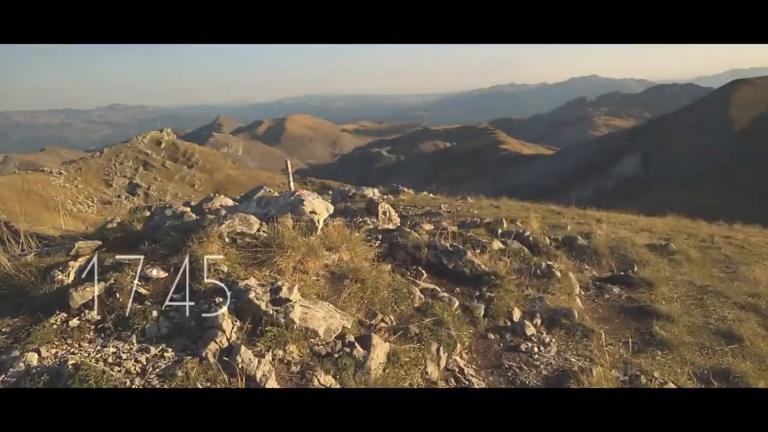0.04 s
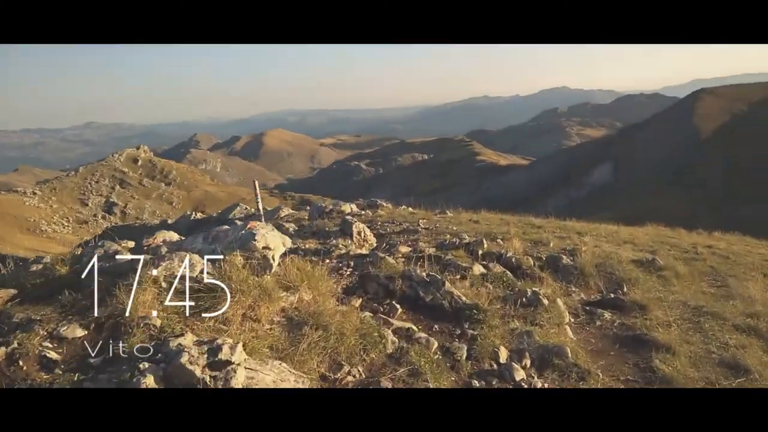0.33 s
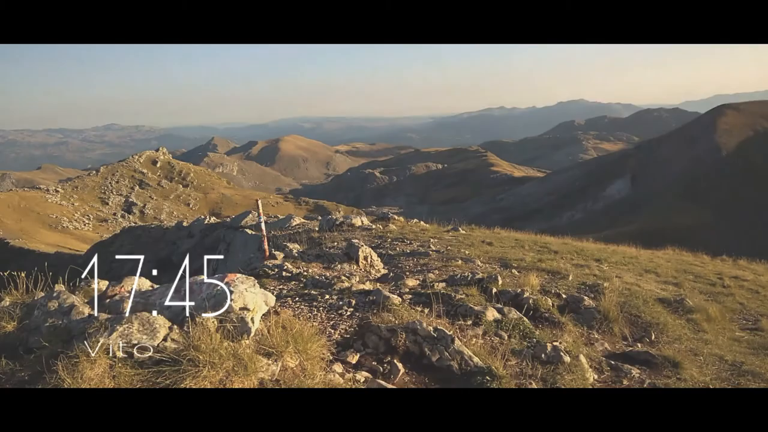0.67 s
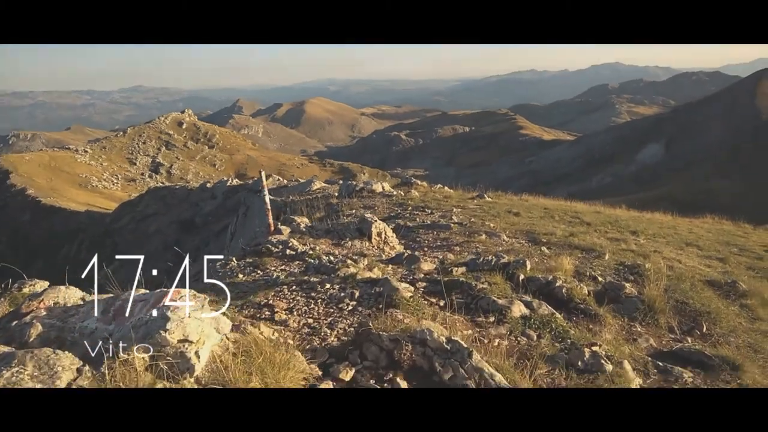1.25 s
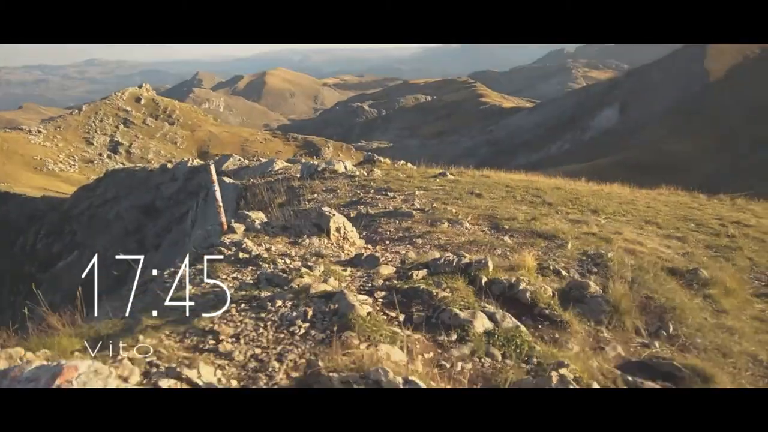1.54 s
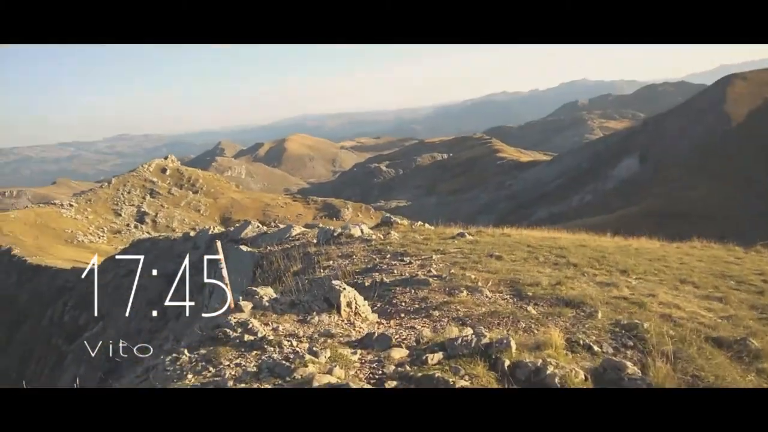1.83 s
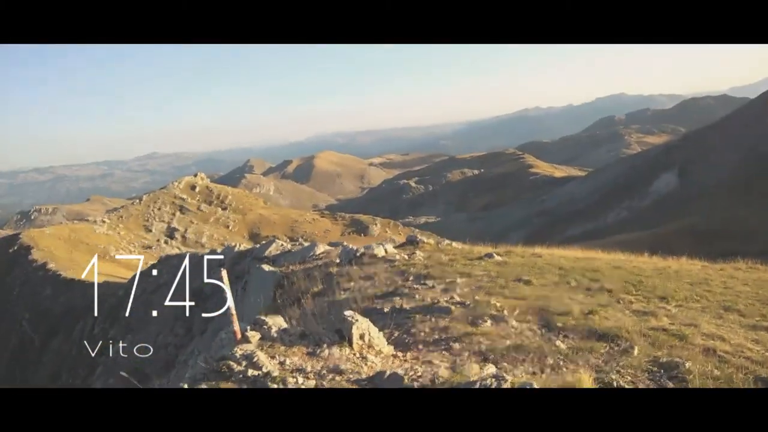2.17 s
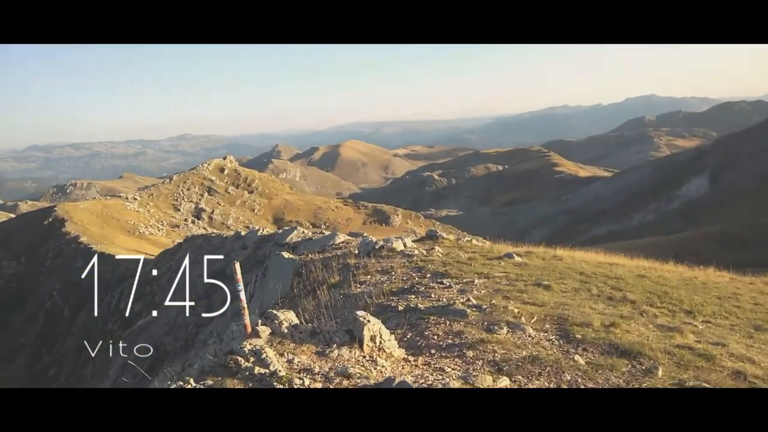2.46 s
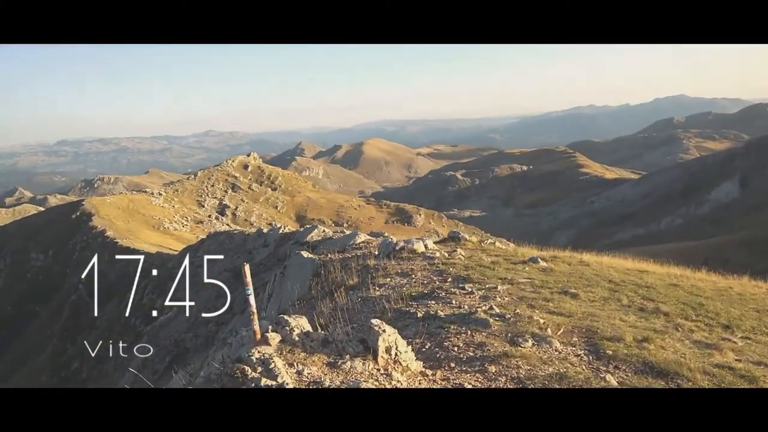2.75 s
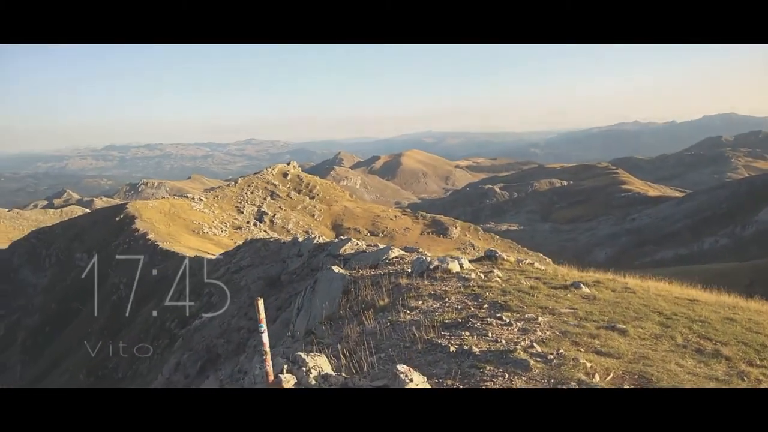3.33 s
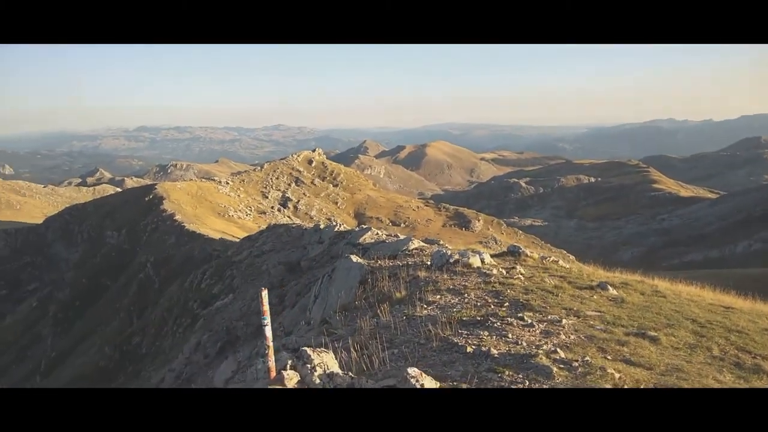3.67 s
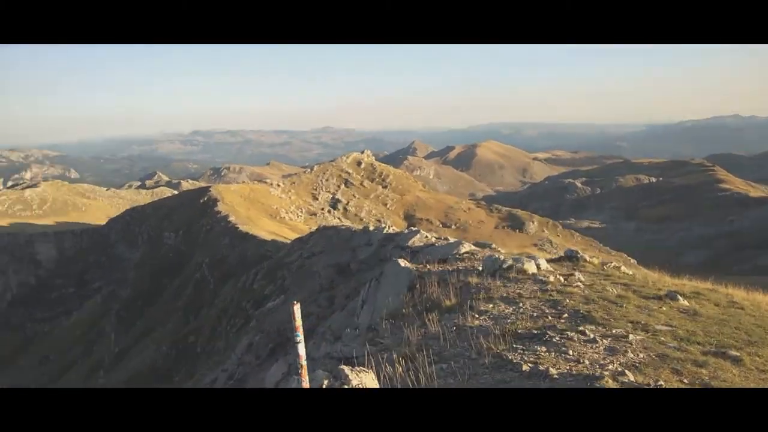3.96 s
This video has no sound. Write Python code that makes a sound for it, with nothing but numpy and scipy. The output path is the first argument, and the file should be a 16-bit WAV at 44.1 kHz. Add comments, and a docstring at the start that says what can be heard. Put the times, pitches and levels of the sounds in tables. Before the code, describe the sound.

Wind buffets the microphone while a walker's boots faintly crunch and clack on rocky ground.

```python
"""Walk on a windy ridge.

A walker crosses stony, grassy ground in gusty wind. Legs brush through dry grass, a pole tip or
loose stones knock and clink on rock, and boots crunch on grit. Turbulence rumbles at the two
microphone ports, and single eddies thump on them, mostly on the left one."""
import sys
import numpy as np
from scipy import signal
from scipy.fft import rfft, irfft
from scipy.io import wavfile
from scipy.ndimage import uniform_filter1d

SR = 44100
rng = np.random.default_rng(int(sys.argv[2]) if len(sys.argv) > 2 else 0)


def dump_mix(stems):
    """Bounce the given channels to the path in sys.argv[1] as a 16-bit WAV at rate SR."""
    frames = np.atleast_2d(stems).T  # one column per channel
    limited = np.clip(frames, -1, 1)  # hard clip at full scale
    pcm = np.round(limited * 32767).astype(np.int16)
    wavfile.write(sys.argv[1], SR, pcm)


N = 176400
TIME_S = np.arange(N) / SR

# Noise colours. Each row: frequency in Hz, relative spectral density in dB.
AIR_SPECTRUM = [(700, 3), (1500, -2), (2500, -2.5), (3900, 6.5), (5500, -7), (16000, -19.5)]
RUMBLE_SPECTRUM = [(15, -11), (35, -11), (70, 0), (130, 3), (260, 1), (400, -8), (600, -34.5), (1000, -42),
                   (1800, -91.5)]
FLUTTER_SPECTRUM = [(150, -33.5), (350, 6), (600, -2), (1000, -21.5), (1500, -30.5), (2500, -72)]
GRASS_SPECTRUM = [(300, 0), (1800, -4.5), (2800, -1), (4000, 4), (5100, -4.5), (5700, -13.5), (9000, -16.5),
                  (11500, -28.5), (15000, -28.5)]
STALK_SPECTRUM = [(3000, -23.5), (6000, 2.5), (9000, 3.5), (14000, -3.5), (16000, 1)]
KNOCK_SPECTRUM = [(500, -36), (1400, -3), (1950, -9.5), (2700, -3.5), (4050, 0.5), (4900, -20.5),
                  (6500, -22.5), (9500, -12), (12000, -25), (15000, -20)]
GRIT_SPECTRUM = [(600, -14), (1500, -1), (2400, 3), (3900, 4.5), (5300, -2), (6600, -6.5), (11500, -25),
                 (15000, -24)]
# Wind strength at each port. Each row: time in seconds, level in dB.
GUSTS_LEFT = [(0.0, -56), (0.06, -42), (0.18, -54), (0.28, -36), (0.56, -45), (0.68, -50.5), (0.74, -36),
              (0.88, -62.5), (1.1, -29), (1.66, -35.5), (1.7, -50.5), (1.82, -46), (2.12, -38),
              (2.2, -30.5), (2.24, -34.5), (2.34, -35.5), (2.6, -44), (2.64, -31), (2.82, -42),
              (2.88, -29.5), (3.06, -39), (3.1, -27.5), (3.2, -43), (3.3, -24.5), (3.4, -40), (3.99, -34)]
GUSTS_RIGHT = [(0.0, -52.5), (0.3, -67), (0.36, -54), (0.54, -60), (0.66, -39.5), (0.88, -58),
               (1.04, -30.5), (1.2, -45.5), (1.62, -39), (1.66, -58.5), (1.72, -49), (1.78, -56),
               (2.28, -32), (2.38, -70.5), (2.52, -35), (2.72, -59), (2.86, -37), (3.34, -34), (3.48, -41),
               (3.74, -43.5), (3.84, -53), (3.99, -46)]
# Strokes through grass and dry stalks. Each row: peak time, rise and fall in seconds, level in dB.
GRASS_SWISHES = [(0.06, 0.029, 0.11, -64.5), (0.35, 0.097, 0.045, -63.5), (0.60, 0.088, 0.071, -67),
                 (0.81, 0.036, 0.066, -63.5), (0.98, 0.078, 0.13, -63.5), (1.28, 0.032, 0.063, -66),
                 (1.53, 0.038, 0.11, -66), (2.07, 0.069, 0.09, -59), (2.495, 0.0095, 0.016, -58),
                 (2.58, 0.036, 0.046, -64), (2.99, 0.069, 0.049, -67.5), (3.58, 0.23, 0.17, -69),
                 (3.76, 0.027, 0.038, -63), (3.93, 0.049, 0.038, -66.5)]
STALK_SWISHES = [(3.61, 0.061, 0.052, -72.5), (3.74, 0.057, 0.063, -77)]
# Knocks on rock. Each row: start in seconds, level in dB, treble gain in dB, rattle decay in seconds,
# bounce delay in seconds, bounce gain in dB, ping gain in dB.
ROCK_KNOCKS = [(0.057, -55.5, -4.5, 0.014, .006, -8, -13), (0.471, -64.5, -26, .005, .004, -16, -35),
               (2.0982, -37, 2.5, .01, .0117, 6, -9), (2.2293, -46, -7, 0.012, .0052, 5, -18),
               (2.3308, -56.5, -9.5, 0.0066, .004, -16, -16), (2.7816, -49.5, -7.5, 0.01, .006, 3, -17),
               (2.8673, -38.5, -45, 0.0053, .0048, -11, -52.5), (2.9459, -47, -13, 0.016, .0082, 1, -9),
               (3.018, -61.5, -17, .009, .007, -2.5, -12)]
# Modes of a struck stone. Each row: frequency in Hz, relative level in dB.
STONE_MODES = [(2330, 3), (2720, 3), (3370, 8), (4030, 5)]
# Metallic ping after a knock. Each row: frequency in Hz, relative level in dB, T60 in seconds.
PING_MODES = [(1640, 8, .1), (6570, -1, .13), (6690, -5, .09)]
# Eddies hitting a port. Each row: time in seconds, length in seconds, level in dB, low-pass corner
# in Hz, port (0 left, 1 right).
EDDY_HITS = [(0.106, 0.0088, -21.5, 320, 0), (0.32, 0.0057, -29.5, 315, 0), (0.404, 0.013, -23, 370, 0),
             (0.569, 0.0047, -26.5, 235, 0), (0.667, 0.009, -24.5, 376, 1), (0.693, 0.025, -26.5, 427, 1),
             (0.977, 0.0026, -12.5, 390, 0), (0.997, 0.017, -23.5, 290, 0), (1.118, 0.0032, -12, 560, 0),
             (1.126, 0.0024, -22, 656, 0), (1.192, 0.0043, -9.5, 366, 0), (1.212, 0.0061, -13, 270, 0),
             (1.241, 0.0026, -20.5, 448, 0), (1.27, 0.017, -10.5, 330, 0), (1.308, 0.0038, -15.5, 450, 0),
             (1.334, 0.0081, -14, 300, 0), (1.359, 0.007, -18.5, 440, 0), (1.387, 0.0018, -28, 520, 0),
             (1.397, 0.0049, -20, 367, 1), (1.428, 0.012, -19.5, 387, 0), (1.474, 0.0056, -26, 523, 0),
             (1.557, 0.0021, -16.5, 386, 0), (1.579, 0.0052, -22, 380, 0), (1.638, 0.0044, -13, 396, 0),
             (1.717, 0.016, -23, 330, 1), (1.823, 0.015, -23.5, 281, 0), (1.877, 0.0072, -25.5, 297, 0),
             (1.988, 0.0024, -18, 370, 0), (2.136, 0.0038, -24.5, 457, 1), (2.174, 0.0021, -9, 412, 0),
             (2.281, 0.0068, -24.5, 480, 1), (2.321, 0.0062, -18, 400, 0), (2.348, 0.0059, -18.5, 410, 0),
             (2.427, 0.0031, -21.5, 357, 0), (2.478, 0.0069, -24.5, 340, 1), (2.558, 0.0091, -22, 400, 1),
             (2.626, 0.0013, -4.5, 451, 0), (2.656, 0.0052, -18, 454, 0), (2.691, 0.0072, -21, 246, 0),
             (2.855, 0.0098, -13.5, 368, 0), (2.88, 0.0068, -18.5, 363, 1), (2.896, 0.012, -15, 440, 0),
             (2.971, 0.037, -25.5, 409, 0), (3.08, 0.003, -14, 374, 0), (3.103, 0.012, -13, 554, 1),
             (3.146, 0.0083, -21.5, 430, 1), (3.197, 0.019, -18, 295, 0), (3.223, 0.014, -20.5, 336, 0),
             (3.309, 0.014, -17, 342, 0), (3.33, 0.0034, -9.5, 466, 0), (3.338, 0.0062, -6, 518.3, 0),
             (3.357, 0.0019, -22.5, 465, 1), (3.554, 0.01, -21.5, 350, 0), (3.767, 0.0072, -12.5, 370, 0),
             (3.789, 0.021, -20, 327, 0), (3.819, 0.0019, -18, 470, 0), (3.833, 0.0054, -12.5, 338, 0),
             (3.857, 0.014, -24, 420, 0)]
# Boots on grit. Each row: peak time, rise and decay in seconds, level in dB.
BOOT_CRUNCHES = [(0.161, 0.0046, 0.0084, -64), (0.490, 0.0067, 0.033, -60.5), (0.772, 0.003, 0.012, -39.5),
                 (0.886, .005, 0.015, -56.5), (1.02, 0.0071, 0.009, -49.5), (1.035, .004, 0.019, -48.5),
                 (1.078, .003, .012, -52), (1.1, 0.0056, 0.0096, -42), (1.108, .001, 0.0049, -41),
                 (1.149, .005, 0.0053, -54.5), (1.237, 0.0016, 0.0054, -50), (2.076, 0.0012, 0.021, -49),
                 (2.932, 0.0012, 0.0099, -57.5), (3.785, 0.0026, .006, -62.5), (3.923, .002, .006, -59)]


def from_db(db):
    """Decibels to gain."""
    return 10 ** (np.asarray(db) / 20)


def unit_rms(x):
    """Scale to rms 1."""
    return x / np.sqrt(np.mean(x ** 2) + 1e-20)


def coloured(x, spectrum):
    """Minimum-phase spectral shaping; rms 1."""
    size, (hz, db) = x.shape[-1], np.transpose(spectrum)
    bins_hz = np.maximum(np.fft.rfftfreq(size, 1 / SR), 1)
    gain = from_db(np.interp(np.log(bins_hz), np.log(hz), db))
    cepstrum = irfft(np.log(gain), size)
    response = np.exp(2 * rfft(cepstrum[:size // 2], size))
    return unit_rms(irfft(rfft(x) * response, size))


def butter(x, hz, kind, order):
    """Butterworth low- or high-pass."""
    return signal.sosfilt(signal.butter(order, hz, kind, fs=SR, output="sos"), x)


def drift(corner_hz):
    """Slow random wander; rms 1."""
    bins_hz = np.fft.rfftfreq(N, 1 / SR)
    return unit_rms(irfft(rfft(rng.standard_normal(N)) / (1 + (bins_hz / corner_hz) ** 4), N))


def clicks(shape, per_s):
    """Randomly timed impulses of either sign."""
    return (rng.random(shape) < per_s / SR) * rng.choice([-1, 1], shape)


def evened(noise, window_s=0.019):
    """Level out the chance peaks of a noise."""
    power = uniform_filter1d(noise ** 2, int(window_s * SR))
    power = uniform_filter1d(power, int(window_s * SR / 2))
    return noise / np.sqrt(np.abs(power) + 1e-9)


def swells(rows):
    """Envelope of Gaussian rises and falls, summed in power."""
    return np.sqrt(sum(
        from_db(db) ** 2 * np.exp(-((TIME_S - peak_s) / np.where(TIME_S < peak_s, rise_s, fall_s)) ** 2)
        for peak_s, rise_s, fall_s, db in rows))


def at_feet(pair, left_db=-10, left_lead_s=0.0005, likeness=0.073):
    """Place a pair at the walker's feet: partly alike, louder on the right."""
    blend = likeness * pair[1] + np.sqrt(1 - likeness ** 2) * pair[0]
    left = np.interp(TIME_S + left_lead_s, TIME_S, blend)
    return np.array([from_db(left_db) * left, pair[1]])


def air(left_db=-82, right_db=-75.5):
    """Faint, steady hiss of still air."""
    return from_db([[left_db], [right_db]]) * coloured(rng.standard_normal((2, N)), AIR_SPECTRUM)


def wind(gusts, rumble_db=6, flutter_db=-12, rumble_swing_db=7.5, flutter_swing_db=6.5):
    """Turbulence at one port: lumpy rumble, with small pops fluttering in the stronger eddies."""
    strength = from_db(np.interp(TIME_S, *np.transpose(gusts)))
    ceiling = 1.22
    eddies = ceiling * np.tanh(drift(corner_hz=36.4) / ceiling)
    swirl = evened(coloured(rng.standard_normal(N), RUMBLE_SPECTRUM))
    rumble = unit_rms(swirl * from_db(rumble_swing_db * eddies))
    pops = clicks(N, per_s=110) * from_db(flutter_swing_db * eddies)
    flutter = coloured(pops, FLUTTER_SPECTRUM)
    return strength * (from_db(rumble_db) * rumble + from_db(flutter_db) * flutter)


def grass(brush_flicker_db=0.92, stalk_flicker_db=1.4):
    """Legs brush through grass: soft swishes and a thin hiss of dry stalks."""
    brush = coloured(rng.standard_normal((2, N)), GRASS_SPECTRUM)
    brush *= from_db(brush_flicker_db * drift(corner_hz=160))
    stalks = coloured(rng.standard_normal((2, N)), STALK_SPECTRUM)
    stalks *= from_db(stalk_flicker_db * drift(corner_hz=60))
    return at_feet(swells(GRASS_SWISHES) * brush) + swells(STALK_SWISHES) * stalks


def stone_clack(t, t60_s=0.039, detune=0.015):
    """Hollow, fast-dying modes of a struck stone, each stone pitched a little differently."""
    pitch = 1 + detune * rng.standard_normal()
    modes = sum(from_db(db + rng.normal(0, 2.5)) * np.cos(2 * np.pi * pitch * hz * t)
                for hz, db in STONE_MODES)
    return from_db(-60 * t / t60_s) * modes


def ping(t):
    """Brief metallic ring of decaying modes in random phase."""
    return sum(from_db(db - 60 * t / t60_s + rng.normal(0, 2))
               * np.sin(2 * np.pi * (hz * t + rng.random())) for hz, db, t60_s in PING_MODES)


def knocks(crack_db=-8, rattle_over_contact_db=17, treble_hz=6650):
    """Pole tip or stone hits rock: a crack with one bounce and a rattle, a clack and a ping."""
    out, size = np.zeros((2, N + SR)), SR // 5
    t = np.arange(size) / SR
    for start_s, db, treble_db, decay_s, bounce_s, bounce_db, ping_db in ROCK_KNOCKS:
        bounce = from_db(bounce_db) * signal.unit_impulse(size, int(bounce_s * SR))
        contact = signal.unit_impulse(size) + bounce
        rattle = unit_rms(np.exp(-t / decay_s) * rng.standard_normal((2, size))) / np.sqrt(size)
        crack = coloured(contact + from_db(rattle_over_contact_db) * rattle, KNOCK_SPECTRUM)
        hit = from_db(crack_db) * crack + stone_clack(t)
        body = butter(hit, treble_hz, "low", order=4)
        treble = from_db(treble_db) * butter(hit, treble_hz, "high", order=4)
        start = int(start_s * SR)
        out[:, start:start + size] += from_db(db) * (body + treble + from_db(ping_db) * ping(t))
    return at_feet(out[:, :N])


def through_port(pressure, corner_hz):
    """Eddy pressure, muffled by the port; rms 1."""
    puff = butter(pressure, 90, "high", order=1)
    puff = butter(puff, corner_hz, "low", order=3)
    return unit_rms(butter(puff, 1.99 * corner_hz, "low", order=3))


def eddy_thumps(gain_db=-1.5, spike_share=0.562, spike_corner_ratio=1.117):
    """Each eddy thumps one port: a suction spike inside milliseconds of swirl."""
    out, size = np.zeros((2, N + SR)), SR // 10
    noises = rng.standard_normal((len(EDDY_HITS), size))
    for (time_s, length_s, db, corner_hz, port), noise in zip(EDDY_HITS, noises):
        start = max(0, int(time_s * SR) - size // 2)
        t = (start + np.arange(size)) / SR - time_s + 0.5 / corner_hz  # early by the filter delay
        swirl = through_port(noise * np.exp(-2 * (t / length_s) ** 2), corner_hz)
        impulse = signal.unit_impulse(size, np.argmin(abs(t)))
        spike = through_port(impulse, spike_corner_ratio * corner_hz)
        puff = unit_rms(np.sqrt(1 - spike_share ** 2) * swirl - spike_share * spike)
        out[port, start:start + size] += from_db(db + gain_db) * puff * np.sqrt(length_s * SR / size)
    return out[:, :N]


def crunches(grain_spread_db=4.5, snap_db=14):
    """Grit breaks under the sole in uneven grains, with one sharp snap at peak load."""
    grains = clicks((2, N), per_s=1800)
    grains = unit_rms(grains * from_db(grain_spread_db * np.minimum(rng.exponential(1, (2, N)), 3)))
    power = np.zeros(N)
    for peak_s, rise_s, decay_s, db in BOOT_CRUNCHES:
        t = TIME_S - peak_s
        power += from_db(db) ** 2 * np.exp(-np.where(t < 0, (t / rise_s) ** 2, 2 * t / decay_s))
        grains[:, int(peak_s * SR)] += from_db(snap_db)
    grit = np.sqrt(power) * grains
    grit_rms = np.sqrt(np.mean(grit ** 2))
    return at_feet(grit_rms * coloured(grit, GRIT_SPECTRUM))


def scene():
    """Wind on both ports over the walker's steps and still air."""
    hiss = air()
    left, right = np.array([wind(GUSTS_LEFT), wind(GUSTS_RIGHT)]) + eddy_thumps()
    ports = np.array([left, butter(right, 55.4, "high", order=1)])
    return ports + knocks() + crunches() + grass() + hiss


def record(dry):
    """Clip at full scale, then low-pass steeply."""
    cutoff_hz = 15750
    lowpass = signal.ellip(12, 0.05, 80, cutoff_hz, fs=SR, output="sos")
    return signal.sosfilt(lowpass, np.clip(dry, -1, 1))


dry = scene()
out = record(dry)
dump_mix(out)
```